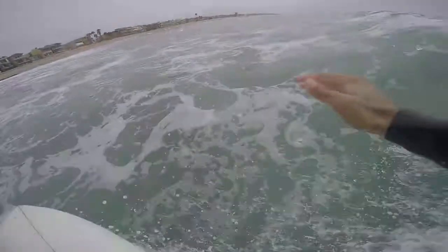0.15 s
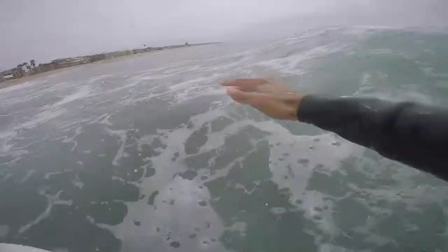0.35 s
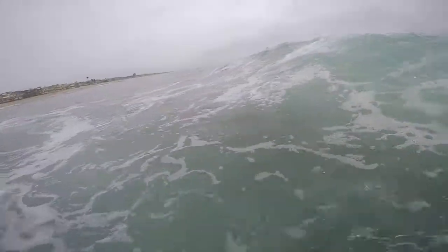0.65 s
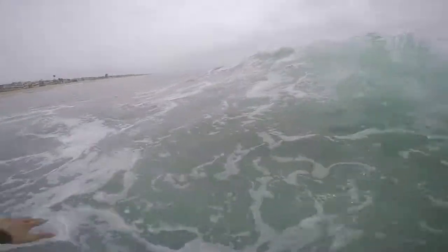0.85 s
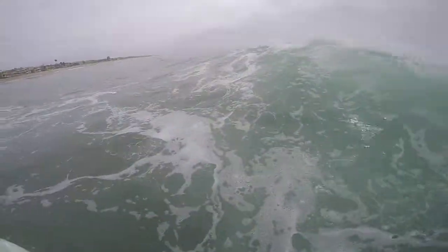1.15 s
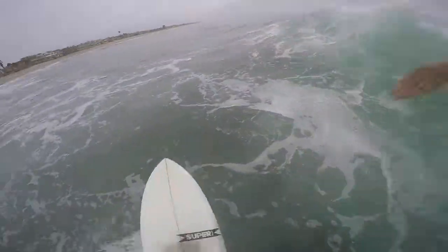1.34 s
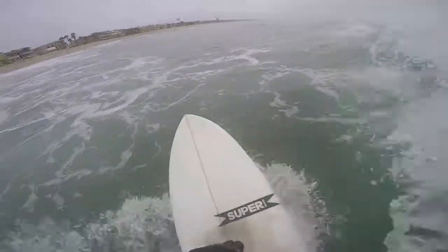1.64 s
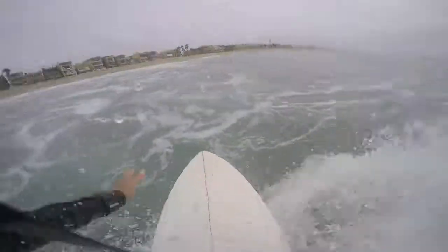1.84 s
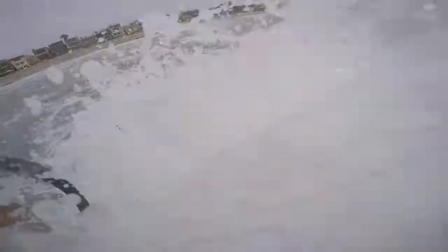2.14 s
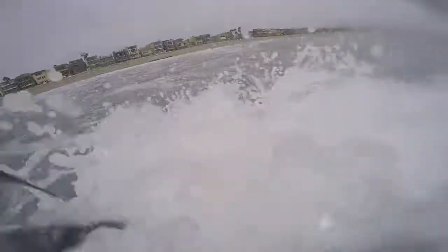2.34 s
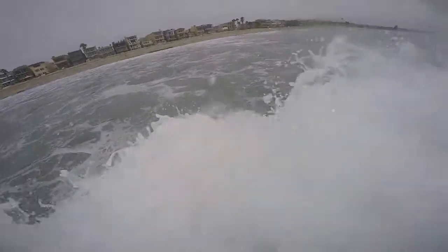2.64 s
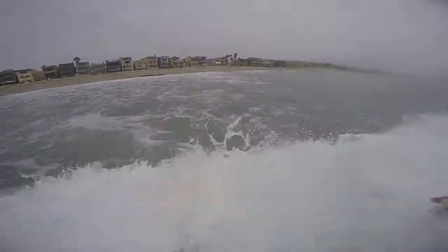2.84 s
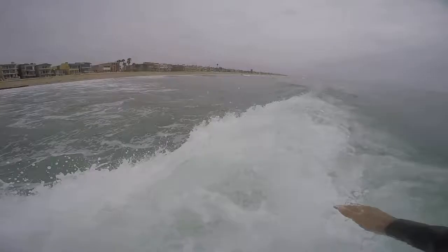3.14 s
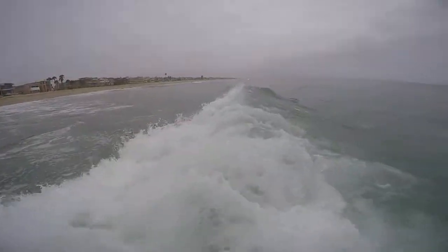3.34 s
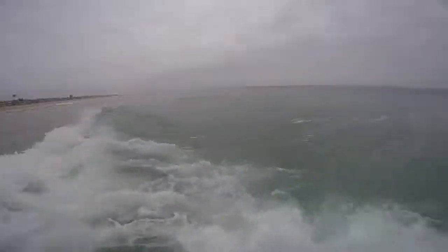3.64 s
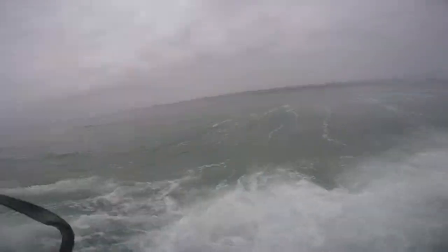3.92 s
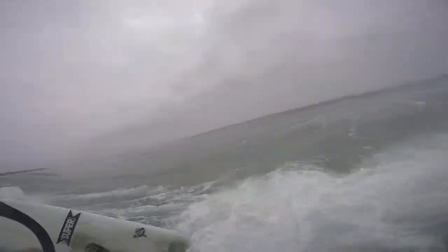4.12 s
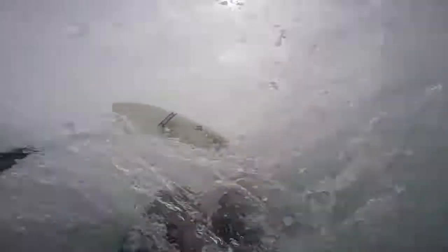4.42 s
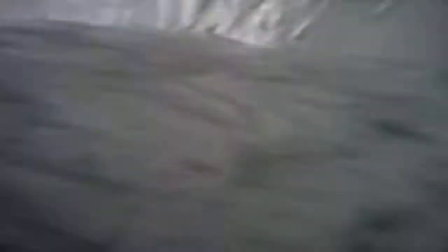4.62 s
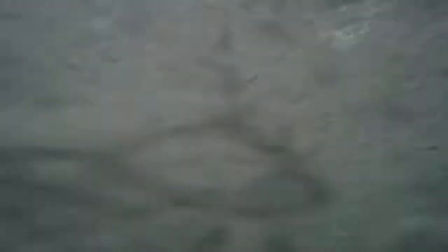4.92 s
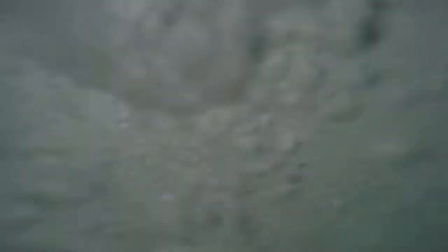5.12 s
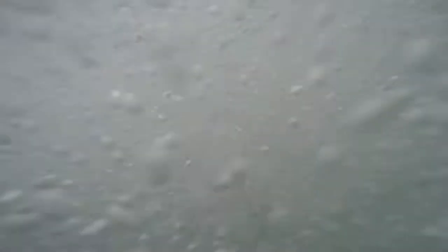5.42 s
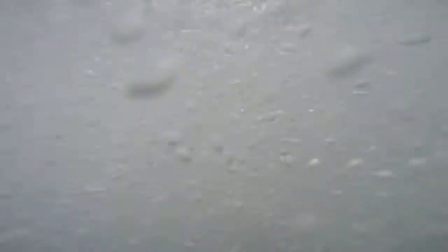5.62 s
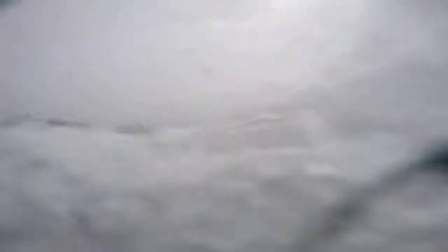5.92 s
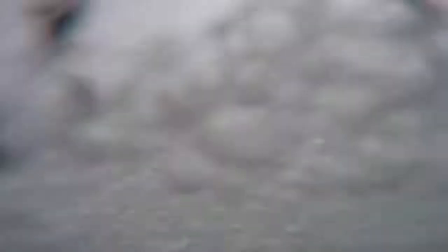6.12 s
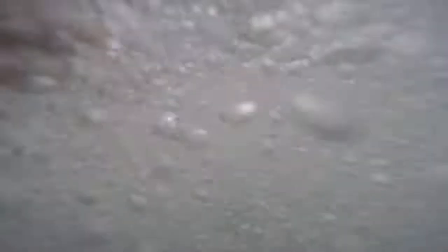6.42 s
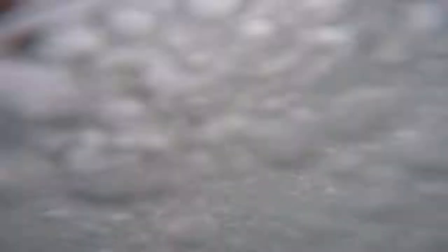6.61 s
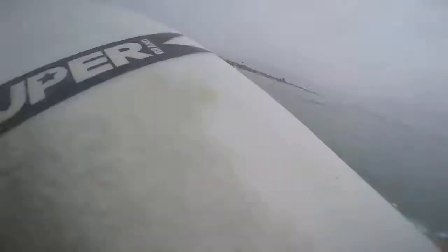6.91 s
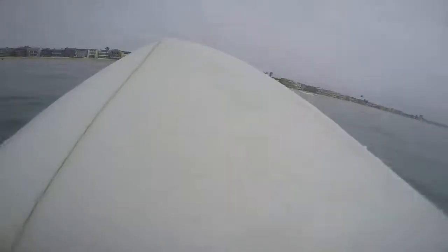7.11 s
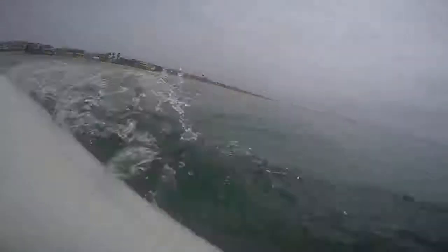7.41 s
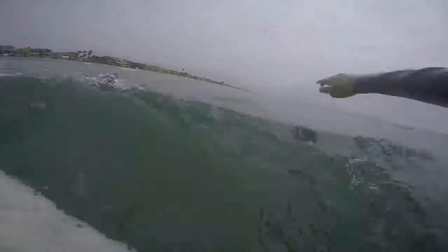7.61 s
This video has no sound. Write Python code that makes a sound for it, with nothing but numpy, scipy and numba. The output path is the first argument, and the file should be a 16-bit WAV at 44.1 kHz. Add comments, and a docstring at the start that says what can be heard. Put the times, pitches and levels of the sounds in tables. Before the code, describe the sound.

The microphone sits in a waterproof case in broken waves off a beach, so water sounds close, boxy and ringing. Soft foam hiss and low buffeting rise over the first 1.5 seconds, with a few knocks and a deep push near 1.45. At 1.8 the wash surges bright and crackling; between 2.05 and 2.25 hard drops and water sheets clatter, overloading the microphone. Drips and foam continue, easing from 3.5 to about 4.2. A heavy thump and raps at 4.3 lead to a dense splash at 4.65-4.75. Underwater until about 6.1, muffled churning, a low throbbing pocket, gurgles, plops and high ticks pass and thin out. Faint trickling follows, then a sharp hit at 6.5 and violent slap at 6.83. Sound drops out briefly around 6.9, returning with low gusts, watery sloshes around 7.1-7.45 and scattered drips and light foam to the end.

```python
"""In broken waves off a beach, with the microphone inside a surfer's waterproof camera case, at arm's length.
Foam, as noise and ringing bubbles, hisses around it; drops and sheets of water rap on the case as short rings
and patter, overloading the microphone, and gusts of low noise buffet the port. A wave closes over the camera:
clouds of bubbles gurgle past as sines of rising pitch. It comes up streaming beside the board."""
import sys
import numpy as np
from scipy import signal
from scipy.fft import rfft, irfft
from scipy.io import wavfile
from scipy.ndimage import uniform_filter1d
from numba import njit

SR = 44100
rng = np.random.default_rng(int(sys.argv[2]) if len(sys.argv) > 2 else 0)


def int16_out(signal):
    """Quantize to a 16-bit WAV file."""
    q = np.round(np.clip(np.atleast_2d(signal).T, -1, 1) * 32767)
    wavfile.write(sys.argv[1], SR, q.astype(np.int16))


N = 342216
TIME = np.arange(N) / SR
BINS = np.maximum(np.fft.rfftfreq(N, 1 / SR), 1)  # Hz, kept above zero for the logarithm
DIVE_S, DIVE_END_S = 4.75, 6.1  # air is dragged under, and the bubbles have risen away by the end


def undb(db):
    """Decibels to gain."""
    return 10 ** (np.asarray(db) / 20)


def unit(x):
    """Scale to rms 1."""
    return x / np.sqrt(np.mean(x ** 2))


def gains(table):
    """One gain curve per dB column."""
    s, *columns = np.transpose(table)
    return [undb(np.interp(TIME, s, column)) for column in columns]


def surge(peak_s, peak_db, rise, fall):
    """A gain that climbs to its peak and falls away again, at steady rates in dB per second."""
    return undb(peak_db - np.maximum(rise * (peak_s - TIME), fall * (TIME - peak_s)))


def walk(rate):
    """Smooth chance with a spread near 1, changing rate times a second."""
    k = max(int(SR / rate), 2)
    steps = np.repeat(rng.standard_normal(N // k + 1), k)
    return unit(uniform_filter1d(steps, k)[:N])


def even(x, seconds):
    """Hold the slow level of a texture at 1, keeping its fast grain."""
    k = int(seconds * SR)
    power = uniform_filter1d(uniform_filter1d(x ** 2, k), k)
    return x / np.sqrt(power + 1e-6)


def add(out, s, x):
    """Mix x into out from time s on."""
    i = max(int(s * SR), 0)
    out[i:i + len(x)] += x[:max(N - i, 0)]


def scatter(start, end, per_s, spread_db, octaves):
    """Chance events between two times: their times, level offsets in dB and pitch ratios."""
    when, loud, high = rng.random((64, 3)).T
    s = start + (np.arange(len(when)) + when) / per_s
    return np.array([s, spread_db * (2 * loud - 1), 2 ** (octaves * (2 * high - 1))])[:, s < end]


def colour(x, points):
    """Filter by a spectrum of (frequency [Hz], level [dB]) points that falls away beyond its ends; rms 1."""
    hz, db = np.transpose(points)
    skirts = 1 / np.sqrt((1 + (hz[0] / BINS) ** 6) * (1 + (BINS / hz[-1]) ** 6))
    shape = undb(np.interp(np.log(BINS), np.log(hz), db))
    return unit(irfft(rfft(x) * skirts * shape, N))


# air modes of the case around the microphone: (frequency [Hz], width [Hz], boost [dB])
CASE_MODES = [(1778, 53, 4.5), (2720, 300, 2), (3810, 330, 4), (5080, 290, 3.5), (8100, 420, -1.5)]


def case(x):
    """The case's air modes ring on top of what passes through."""
    response = 1
    for hz, width, db in CASE_MODES:
        response = response + (undb(db) - 1) / (1 + 1j * (BINS ** 2 - hz ** 2) / (BINS * width))
    return irfft(rfft(x) * response, N)


@njit
def ring(start, hz, cycles, size, glide, swell):
    """Sines that build up over a share swell of their life, then die away while the pitch rises by glide."""
    out = np.zeros(N)
    for k in range(len(start)):
        n, phase = int(cycles[k] * SR / hz[k]), 0.
        first, fall, a = int(start[k]), np.exp(-6.9 / n), size[k]  # 60 dB down after n samples
        for i in range(min(n, N - first)):
            phase += 2 * np.pi * hz[k] / SR * (1 + glide * i / n)
            a *= fall
            u = min(i / (swell * n), 1.)
            out[first + i] += a * np.sin(phase) * u * u * (3 - 2 * u)
    return out


def bubbles(count, centre_hz, octaves, cycles, spread_db, glide=0.19, swell=0.11):
    """A cloud of ringing bubbles of many sizes: most are faint, a few are close and loud."""
    when, width, side, life, near = rng.random((count, 5)).T
    start = when * (N - 1)
    centre = np.broadcast_to(centre_hz, N)[start.astype(int)]
    hz = np.clip(centre * 2 ** (octaves * (width - side)), 30, SR / 3)
    size = undb(min(spread_db, 7) * np.minimum(-np.log(1 - near), 4))
    return unit(ring(start, hz, max(cycles, 2) * (.5 + life), size, float(glide), float(swell)))


# foam around the microphone: the wave breaks, passes, closes over and lets it up again;
# before the trims of hiss and fizz: (time [s], level [dB])
FOAM_LEVEL = [(0, -49.5), (0.8, -43.5), (1.2, -40.5), (1.66, -38.5), (1.84, -31), (2.2, -34), (2.28, -37.5),
              (2.8, -36.5), (3.55, -41), (4.05, -47), (4.3, -40), (4.57, -51), (4.68, -24.5), (4.82, -48.5),
              (5.3, -68), (5.9, -54), (6.5, -40.5), (6.8, -45.5), (6.92, -45), (7.1, -51), (7.76, -45.5)]
# fine fizz, before its trim, and the share of single close bursts in the foam:
# (time [s], fizz level [dB re foam], burst level [dB re noise])
SPRAY_LEVEL = [(0, -2, -7), (1.35, -5.5, -7.5), (1.7, 0, -8.5), (2.15, -8, -1.5), (2.3, -11.5, -5.5),
               (3.2, -9.5, -6), (4.3, -8, -6), (4.8, -12.5, 0), (6.6, -15, 0.5), (7.3, -10.5, 0)]
# strength of the flow past the case and port, before the trims of its users: (time [s], level [dB])
FLOW_LEVEL = [(0, -33), (0.75, -19.5), (1.18, -20), (1.3, -28), (2.1, -19.5), (2.65, -29), (3.35, -28),
              (3.75, -39), (4.1, -33), (4.33, -13), (4.6, -28.5), (4.7, -19), (4.84, -36), (5.35, -29.5),
              (5.8, -41), (6.4, -27.5), (6.55, -19.5), (6.72, -29.5), (6.9, -13.5), (7.35, -18),
              (7.76, -16.5)]
# spectra of hiss, fizz and roar: (frequency [Hz], level [dB])
FOAM_COLOUR = [(1000, -20), (1350, -9), (1700, 2.5), (2300, -2), (2800, 0), (3300, -6), (4000, -5),
               (5200, -8), (6500, -13), (9000, -50), (14000, -16)]
FIZZ_COLOUR = [(4500, 10), (7000, 1.5), (8200, 0.5), (10000, -6), (11800, -3), (15500, -16)]
ROAR_COLOUR = [(90, 10), (160, 3.5), (300, 2.5), (500, -3), (700, -6), (950, -3), (1200, -15.5),
               (1500, -11.5), (2200, -3.5)]


def surf(flicker_db=1.5):
    """Foam is countless tiny bursts merging into hiss, the nearest heard singly, over the roar of the break."""
    foam_gain, = gains(FOAM_LEVEL)
    fine, close = gains(SPRAY_LEVEL)
    flow_gain, = gains(FLOW_LEVEL)
    # the roar grows with the foam and with the flow past the case
    roar_gain = np.hypot(undb(-3.5) * foam_gain, undb(-28) * flow_gain)
    crackle = bubbles(count=7000, centre_hz=2847, octaves=2.01, cycles=13.4, spread_db=3.5)
    sparkle = bubbles(count=7000, centre_hz=10000, octaves=.8, cycles=16, spread_db=4.5)
    foam = unit(case(colour(rng.standard_normal(N) + close * crackle, FOAM_COLOUR)))
    fizz = colour(rng.standard_normal(N) + close * sparkle, FIZZ_COLOUR)
    roar = colour(rng.standard_normal(N), ROAR_COLOUR) * undb(1.6 * walk(25))
    hiss = foam_gain * (undb(2) * foam + undb(1.5) * fine * fizz)
    return undb(flicker_db * walk(30)) * (hiss + undb(2.0) * roar_gain * roar)


def plop(db, hz, t60, overtone_db, knock_db, crack_db, tail_db, tail_t60):
    """A drop or bubble rings for a few cycles, with a duller knock, an overtone, a crack and a short wet tail."""
    t = TIME[:SR // 16]
    # the ring holds briefly, then collapses as the drop flattens
    fall = undb(-60 * (t / t60) ** 1.36)
    tone = np.sin(2 * np.pi * hz * t)
    knock = undb(knock_db) * np.sin(2 * np.pi * hz * rng.uniform(.66, .72) * t)
    overtone = undb(overtone_db) * np.sin(2 * np.pi * hz * rng.uniform(1.92, 2.02) * t)
    # harder hits crack more brightly
    crisp_band = signal.butter(1, [2500, 6000], "band", fs=SR, output="sos")
    crisp = signal.sosfilt(crisp_band, rng.standard_normal(len(t)))
    crack = undb(crack_db + 0.72 * db) * unit(crisp)
    wet_band = signal.butter(3, [650, 2900], "band", fs=SR, output="sos")
    wet = signal.sosfilt(wet_band, rng.standard_normal(len(t)))
    tail = undb(tail_db - 60 * t / tail_t60) * unit(wet)
    onset = 1 - np.exp(-t / 0.00028)
    sound = undb(db) * onset * (fall * (tone + knock + overtone + crack) + tail)
    return signal.sosfilt(signal.butter(1, 300, "high", fs=SR, output="sos"), sound)


# biggest drops striking the case, before its air modes and the trim:
# (time [s], ring level [dB], pitch [Hz], t60 [s], overtone [dB re ring])
DROPS_ON_CASE = [(0.4471, -12.5, 920, 0.0022, -3), (1.431, -7.5, 1170, 0.0029, -13),
                 (1.443, -12, 1190, 0.0038, -18), (1.4638, -9.5, 1240, 0.011, -26),
                 (1.8036, -2, 1820, 0.0036, -9), (1.8652, -3.5, 840, 0.0025, -2),
                 (1.9822, 1, 2880, 0.0038, -10.5), (2.053, -6.5, 2350, 0.0028, -13),
                 (2.067, -4, 2280, 0.0033, 0.5), (2.0915, 12, 2750, 0.0039, -11.5),
                 (2.111, 10.5, 1870, 0.0038, -11), (2.1336, 0.5, 2900, 0.0043, -19),
                 (2.1995, 11, 2400, 0.0027, -17), (2.5195, -2, 2430, 0.0023, -6.5),
                 (2.595, -2, 2120, 0.0043, -14), (2.6396, -8, 2030, 0.0043, -9),
                 (2.768, -8, 1740, 0.0021, -23), (2.7987, 4.5, 1700, 0.0058, -31),
                 (2.809, -8.5, 1230, 0.0096, -15), (4.334, 12, 1232, 0.0064, -5),
                 (4.3725, -1.5, 1800, 0.0061, -20), (4.379, 2, 2090, 0.0072, -29),
                 (4.425, -4, 1830, 0.0052, -15.5), (4.437, -16, 1330, 0.0091, -13),
                 (4.5105, -18, 810, 0.012, -6), (4.5228, -14.5, 1850, 0.0045, -22),
                 (4.6693, 2, 1140, 0.0045, -1), (4.6892, 1, 1580, 0.0045, -8),
                 (4.7231, 13, 2020, 0.0025, -23), (6.4741, -10.5, 1066, 0.0047, -5.5),
                 (6.5222, 12, 1900, 0.0033, -11.5), (6.8328, 9.5, 1390, 0.0033, 0.5),
                 (6.8492, 2, 710, 0.0017, 4), (6.9151, -11, 646, 0.0021, -10),
                 (6.9531, -5.5, 1670, 0.0026, -7), (7.0388, 6.5, 1270, 0.0074, -4),
                 (7.3198, -6.5, 2030, 0.0024, -23), (7.471, -4.5, 1133, 0.011, -10),
                 (7.5668, -14, 1180, 0.011, -11)]
# showers of lesser drops after splashes: (start [s], end [s], middle ring level [dB], middle pitch [Hz])
DRIP_SHOWERS = [(1.98, 2.32, -12, 2100), (2.621, 2.98, -18, 2100), (6.531, 6.68, -13.5, 1570),
                (7.38, 7.75, -17.5, 1200)]


def drops():
    """Drops rap on the case from outside, setting off its air modes."""
    out = np.zeros(N)
    drips = []
    for start, end, level, hz in DRIP_SHOWERS:
        for s, db, ratio in scatter(start, end, per_s=17, spread_db=3, octaves=0.68).T:
            drips.append((s, level + db, hz * ratio, 0.0056, -14.5))
    for s, db, hz, t60, overtone_db in DROPS_ON_CASE + drips:
        add(out, s, plop(db, hz, t60, overtone_db, knock_db=-4.0, crack_db=-28, tail_db=-17.5, tail_t60=0.019))
    return undb(0.5) * case(out)


# sheets of water breaking on the case, scaling a patter and rush: (time [s], length [s], level [dB])
SHEETS_ON_CASE = [(1.787, 0.23, -29), (2.064, 0.014, -12.5), (2.08, 0.038, -19.5), (2.129, 0.0089, -17),
                  (2.14, 0.03, -28.5), (2.189, 0.021, -17), (2.21, 0.0096, -10.5), (2.226, 0.024, -26.5),
                  (2.622, 0.0071, -22.5), (2.79, 0.035, -29.5), (4.292, 0.026, -32.5), (4.626, 0.032, -20),
                  (4.647, 0.081, -15), (4.722, 0.089, -28.5), (6.499, 0.065, -37), (6.833, 0.0025, 0.5),
                  (6.846, 0.0096, -6.5)]


def sheets():
    """Thrown water lands as a dense patter of very short impacts."""
    force = np.zeros(N)
    for s, length, db in SHEETS_ON_CASE:
        add(force, s, undb(db) * signal.windows.tukey(max(int(length * SR), 8), .45))
    patter = bubbles(count=40000, centre_hz=2460, octaves=2.31, cycles=3.55, spread_db=2.0)
    rush_colour = [(90, 19), (200, 8), (500, 2.5), (2000, -4.0), (5000, -11.5), (15000, -19.5)]
    rush = colour(rng.standard_normal(N), rush_colour)
    return force * even(case(patter + undb(1.5) * rush), 0.0082)


# spectrum of the eddies on the port: (frequency [Hz], level [dB])
EDDY_COLOUR = [(8, 4.5), (17, 5), (28, -1), (45, -12), (70, -23), (110, -33.5), (200, -44), (400, -68)]
# slugs of water pushing on the case, before the port stiffens: (time [s], level [dB], frequency [Hz])
WATER_PUSHES = [(1.47, -3.5, 30.2), (1.491, -16, 95), (2.207, -15, 60), (4.289, -1, 21.6),
                (4.357, -3.5, 50.3), (4.654, -1.5, 88), (4.668, -5, 61), (4.687, -11, 130),
                (5.784, -20.5, 114), (5.95, -23.5, 79), (6.523, -3.5, 253), (6.539, -5, 35.7),
                (6.83, -3.5, 70.5), (6.848, 0, 405), (6.85, 0.5, 124), (6.868, -13, 246)]


def buffet():
    """Slow eddies press on the port, and slugs of water give it single heaving pushes."""
    flow_gain, = gains(FLOW_LEVEL)
    eddies = even(colour(rng.standard_normal(N), EDDY_COLOUR), 0.12)
    gusts = undb(2.5 * walk(6.3))  # uneven, 6.3 changes a second
    out = undb(4.0) * flow_gain * eddies * gusts
    t = TIME[:SR // 4]
    for s, db, hz in WATER_PUSHES:
        turn = hz * t
        add(out, s, undb(db) * np.sin(2 * np.pi * turn) * np.exp(-turn ** 2) * (1 - np.exp(-turn / 0.06)))
    # the port's membrane stiffens under the strongest pushes
    return .8 * np.tanh(out / .8)


# parts of the bubble cloud passing the microphone, before each part's trim: big pockets, middling, small
# and tiny bubbles, churning foam: (peak time [s], peak level [dB], rise [dB/s], fall [dB/s])
BUBBLE_CLOUD = [(5.17, -28.5, 28, 21.5), (5.57, -27, 11, 78), (4.96, -33, 10, 11.5), (4.83, -47.5, 10, 27),
                (4.94, -37, 10, 13.5)]
# one large trapped pocket throbs: (peak time [s], peak level [dB], rise [dB/s], fall [dB/s])
TRAPPED_POCKET = (4.96, -27.5, 8, 190)
# spectrum of the churning foam cloud: (frequency [Hz], level [dB])
CHURN_COLOUR = [(250, 4.5), (800, 9), (1200, 3), (1800, 5), (2700, -1), (4000, -20), (6000, -39),
                (9000, -39), (15000, -38)]


def underwater():
    """Air dragged under breaks up: pockets gurgle, bubbles plop, the smallest tick against the case."""
    submerged = uniform_filter1d(1. * ((TIME > DIVE_S) & (TIME < DIVE_END_S)), size=3000)
    big_gain, middle_gain, small_gain, tiny_gain, churn_gain = (surge(*row) for row in BUBBLE_CLOUD)
    big = bubbles(count=1400, centre_hz=188, octaves=1.62, cycles=8.1, spread_db=2.5)
    middle = bubbles(count=2400, centre_hz=717, octaves=1.14, cycles=15.7, spread_db=3.5, glide=.1, swell=.2)
    small = bubbles(count=2900, centre_hz=1940, octaves=0.93, cycles=29, spread_db=6.5, glide=0.065, swell=0.21)
    ticks = bubbles(count=2600, centre_hz=4300, octaves=.8, cycles=20, spread_db=4.5, glide=.04, swell=.2)
    fine = bubbles(count=3000, centre_hz=9250, octaves=0.76, cycles=17, spread_db=7.0)
    pocket_hz = 144 * (1 + 0.056 * walk(35))
    throb = np.sqrt(2) * np.sin(2 * np.pi * np.cumsum(pocket_hz) / SR) * undb(2 * walk(40))
    churn = churn_gain * colour(rng.standard_normal(N), CHURN_COLOUR) * undb(2 * walk(70))
    gurgle = undb(1.0) * big_gain * even(big, 0.089) + undb(-7.5) * middle_gain * even(middle, 0.17)
    prickle = undb(-3.0) * small_gain * even(small, 0.066) + tiny_gain * (ticks + undb(-13) * fine)
    return submerged * (churn + gurgle + prickle + surge(*TRAPPED_POCKET) * throb)


# closest bubbles bursting under water, before the trim: (time [s], ring level [dB], pitch [Hz], t60 [s])
CLOSE_GULPS = [(4.7885, -8, 2350, 0.0041), (4.9605, -10.5, 1220, 0.0062), (5.3851, -8.5, 760, 0.0052),
               (5.4042, -16, 720, 0.029), (5.4712, -7, 540, 0.011), (5.6192, -7.5, 653, 0.003),
               (5.686, -7, 3170, 0.0013), (5.6992, -7, 1440, 0.0056), (5.7266, -11.5, 1870, 0.0068),
               (5.741, -12, 3680, 0.0022), (5.8678, -14.5, 503, 0.0055)]


def gulps():
    """Bubbles bursting under water are rounder than drops; lesser ones go on all through the dive, ever fainter."""
    out = np.zeros(N)
    bursts = []
    for s, db, ratio in scatter(DIVE_S, DIVE_END_S, per_s=14, spread_db=2.5, octaves=1.0).T:
        faded_db = -13 + db - 5.5 * (s - DIVE_S)
        bursts.append((s, faded_db, 1650 * ratio, 0.0049))
    for s, db, hz, t60 in CLOSE_GULPS + bursts:
        add(out, s, plop(db, hz, t60, overtone_db=-11, knock_db=-13, crack_db=-49, tail_db=-17, tail_t60=0.029))
    return undb(-2) * out


# loudest tiny bubbles snapping on the wet case: (time [s], level before decay [dB], pitch [Hz], t60 [s])
LOUD_SNAPS = [(4.893, -17, 4770, 0.0042), (5.059, -15.5, 4800, 0.0048), (5.239, -25, 6340, 0.0034),
              (5.385, -21, 4660, 0.011), (5.473, -27, 5370, 0.011), (5.969, -16, 13600, 0.0023),
              (6.132, -24, 9400, 0.0015), (6.475, -20, 14300, 0.0073)]


def snaps():
    """Each tiny bubble gives a soft-edged, high tick; fainter ones go on until the case has drained."""
    faint = []
    for s, db, ratio in scatter(DIVE_S, 6.8, per_s=9, spread_db=10, octaves=0.52).T:
        # the bubbles left get smaller, so their pitch climbs
        hz = ratio * (4620 + 3650 * (s - DIVE_S))
        faint.append((s, -30.5 + db, hz, 0.0049))
    s, db, hz, t60 = np.transpose(LOUD_SNAPS + faint)
    return ring(s * SR, 1. * hz, hz * t60, undb(db), .06, .07)


# surges of water beside the board and draining off the case: (time [s], length [s], level [dB], pitch [Hz])
WATER_SURGES = [(2.2, 0.35, -46, 990), (2.75, 0.17, -42, 980), (4.28, 0.2, -45, 1130),
                (6.037, 0.42, -44.5, 743), (6.42, 0.18, -40, 870), (6.58, 0.24, -47.5, 840),
                (7.075, 0.23, -31, 970), (7.373, 0.078, -32, 820)]
# quiet lapping between the surges: (peak time [s], peak level [dB], rise [dB/s], fall [dB/s])
QUIET_LAPPING = (3.0, -48.5, 11, 5)


def slosh():
    """Water runs in a stream of small gurgles whose pitch wanders, with a finer trickle above."""
    flow = surge(*QUIET_LAPPING)
    for s, length, db, _ in WATER_SURGES:
        # 0.48 of each surge is spent swelling and ebbing
        add(flow, s, undb(db) * signal.windows.tukey(int(length * SR), 0.48))
    s, length, _, hz = np.transpose(WATER_SURGES)
    pitch = np.interp(TIME, s + length / 2, hz)
    gurgle = bubbles(count=10000, centre_hz=pitch, octaves=0.79, cycles=10.7, spread_db=3.5,
                     glide=0.071, swell=0.19)
    trickle = bubbles(count=3500, centre_hz=2900, octaves=1.76, cycles=27, spread_db=8.0, glide=.05)
    return flow * (even(gurgle, 0.2) + undb(-8) * trickle)


# the sound cuts out for a moment: (start [s], end [s])
SILENT_SPAN = (6.873, 6.915)


def scene():
    """Surf, buffeting and water on the case are summed; all of it cuts out for a moment."""
    audible = uniform_filter1d(1. * ((TIME < SILENT_SPAN[0]) | (TIME > SILENT_SPAN[1])), size=40)
    on_case = drops() + sheets() + buffet()
    below = underwater() + gulps() + snaps()
    return ((surf() + on_case + below + slosh()) * audible)[None]


def record(dry):
    """The closest hits overload the microphone; the top is cut above 15.5 kHz."""
    clipped = dry / (1 + (dry / .98) ** 6) ** (1 / 6)
    return signal.sosfilt(signal.ellip(8, .2, 70, 15500, fs=SR, output="sos"), clipped)


dry = scene()
out = record(dry)
int16_out(out)
```